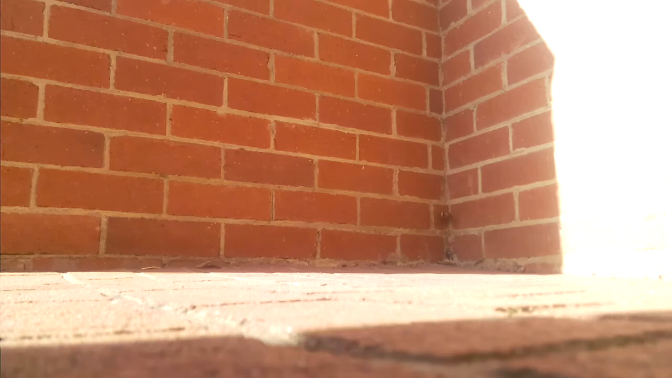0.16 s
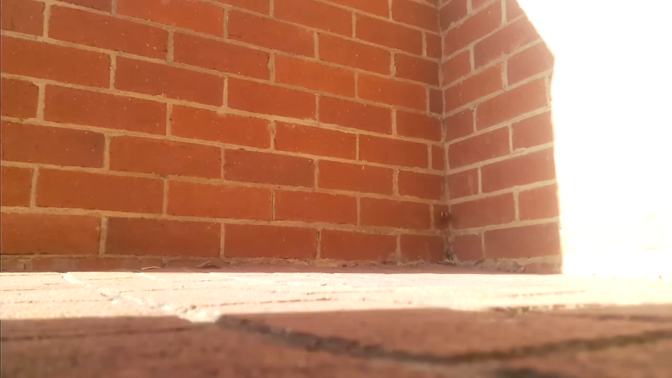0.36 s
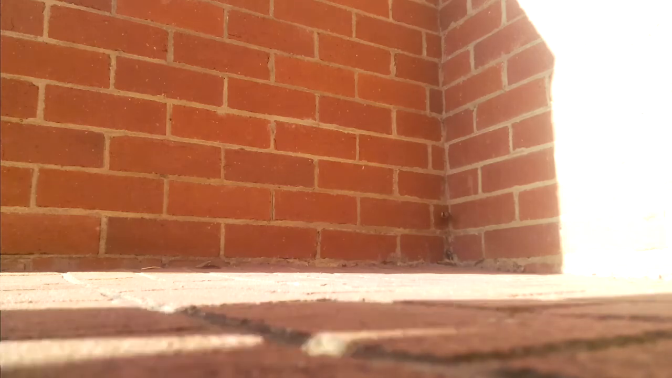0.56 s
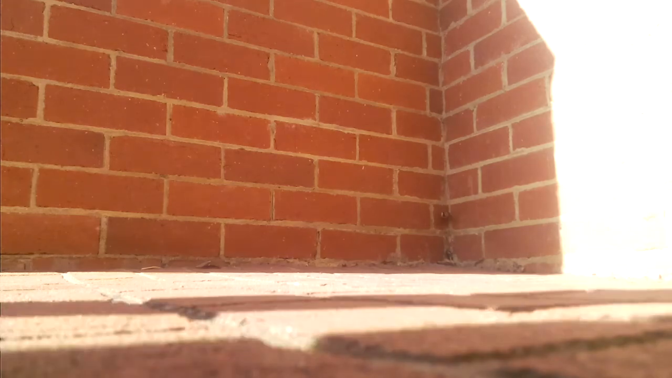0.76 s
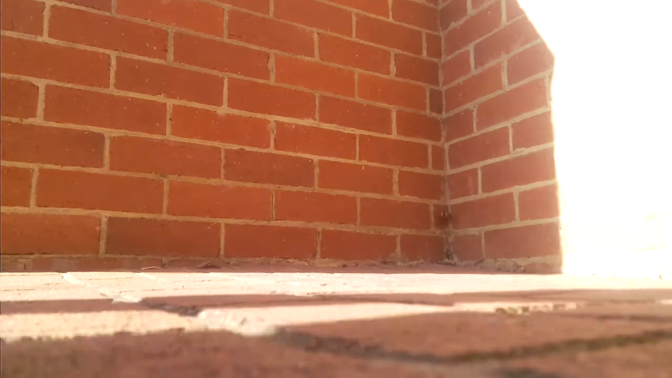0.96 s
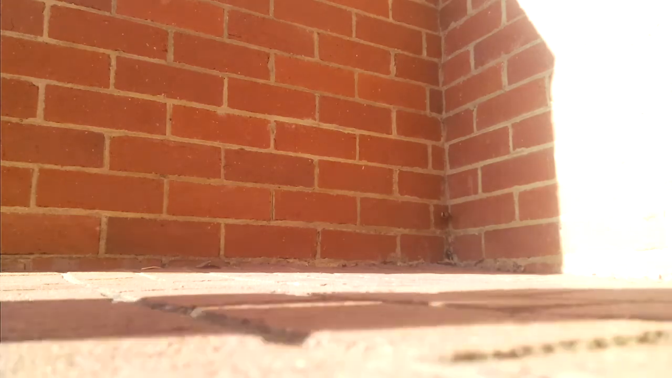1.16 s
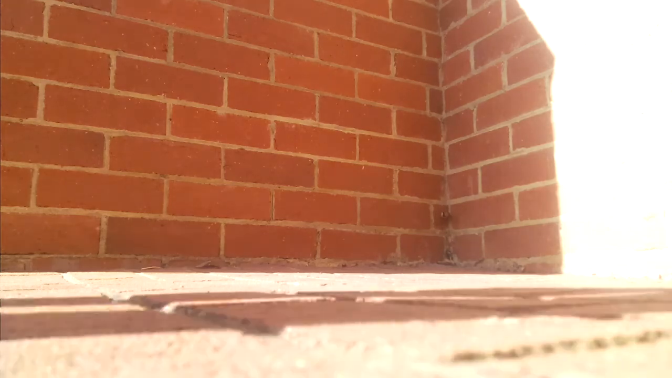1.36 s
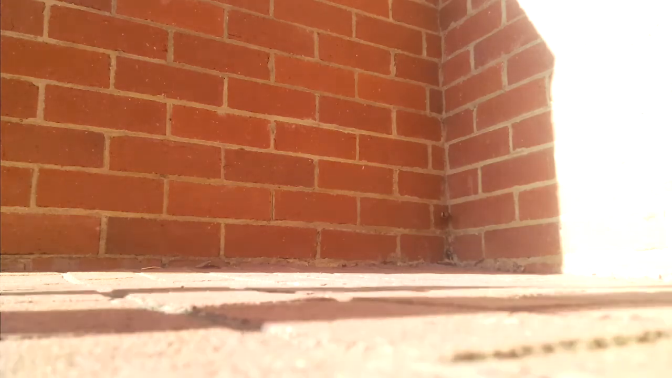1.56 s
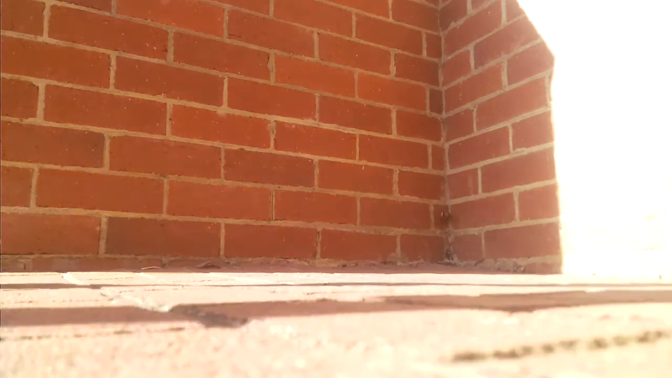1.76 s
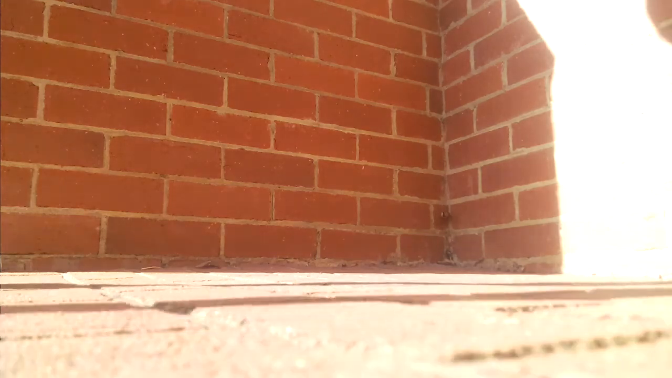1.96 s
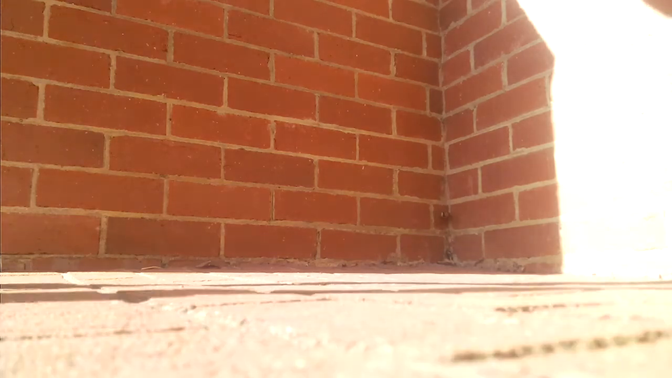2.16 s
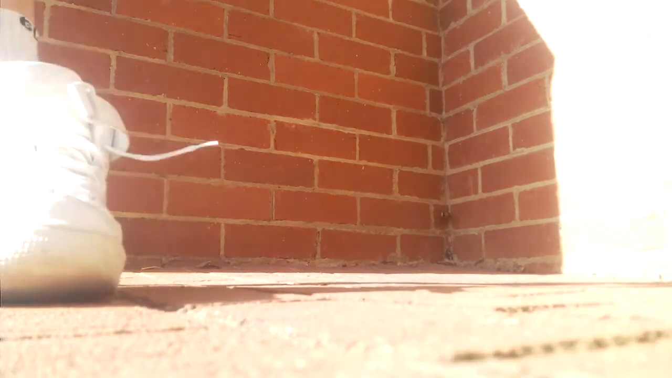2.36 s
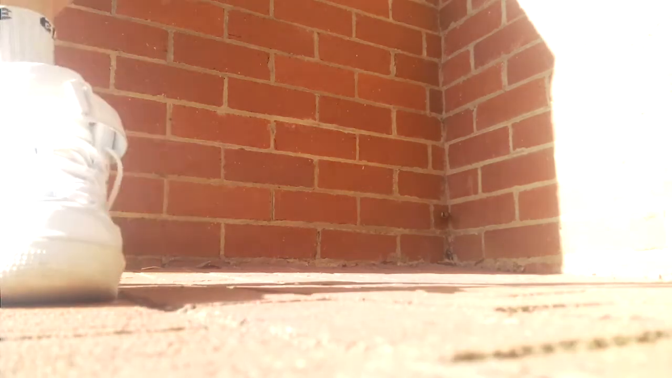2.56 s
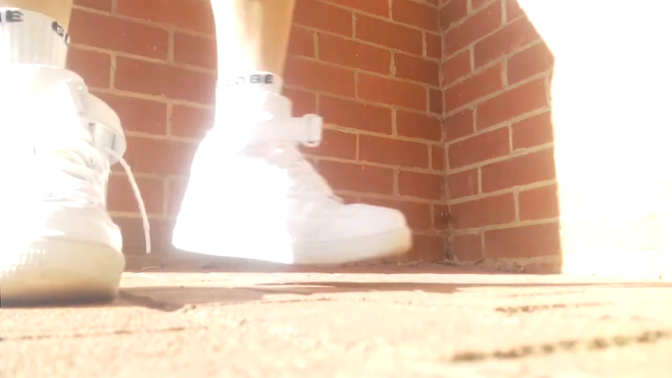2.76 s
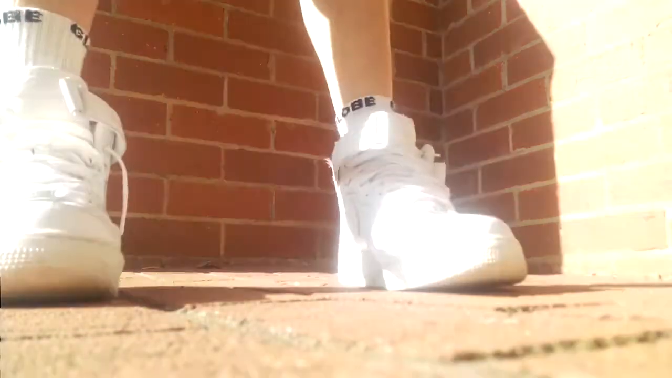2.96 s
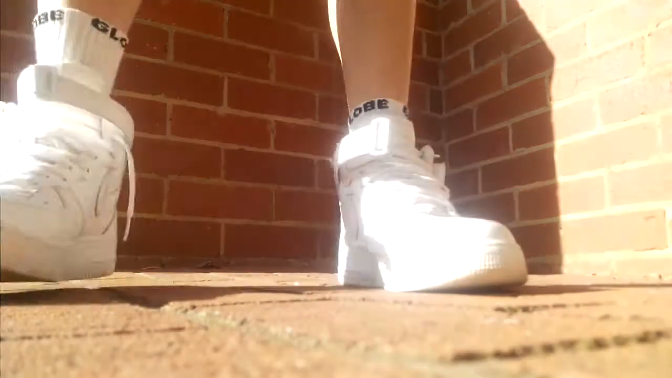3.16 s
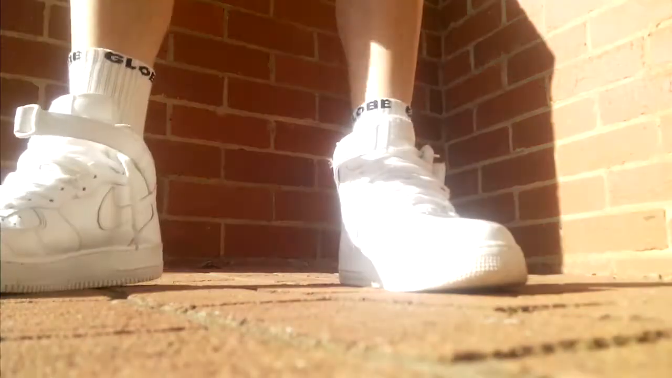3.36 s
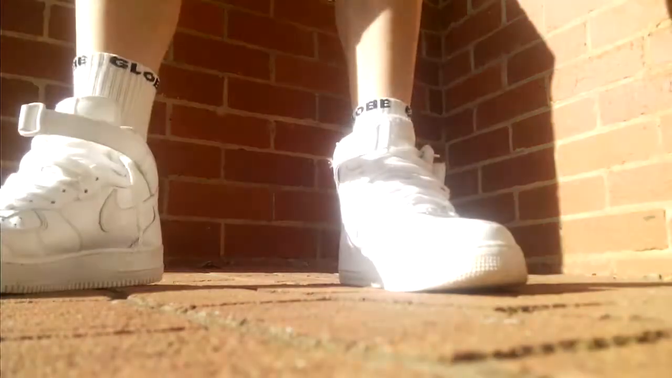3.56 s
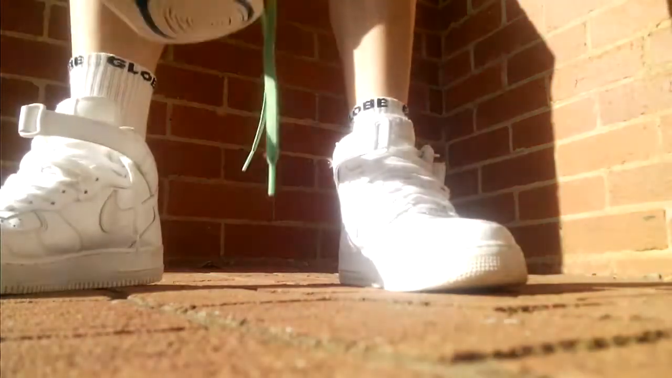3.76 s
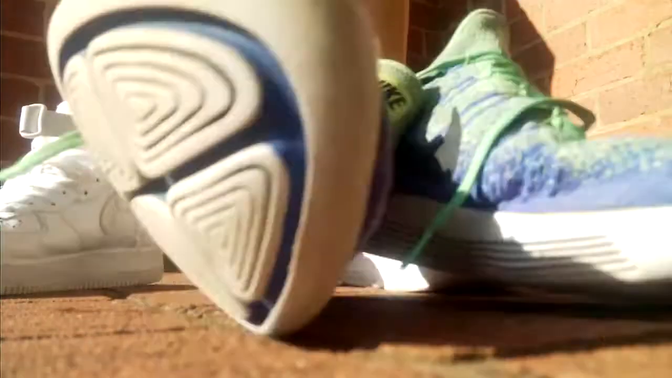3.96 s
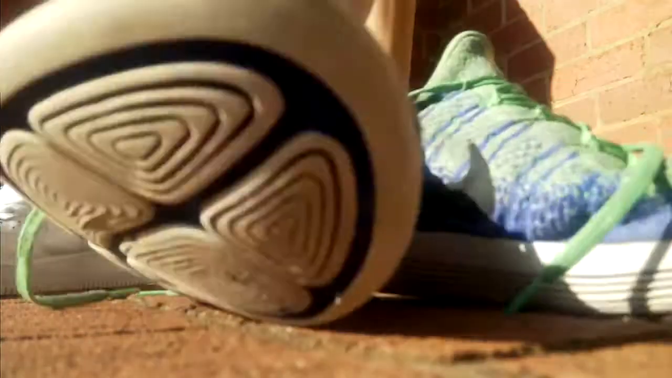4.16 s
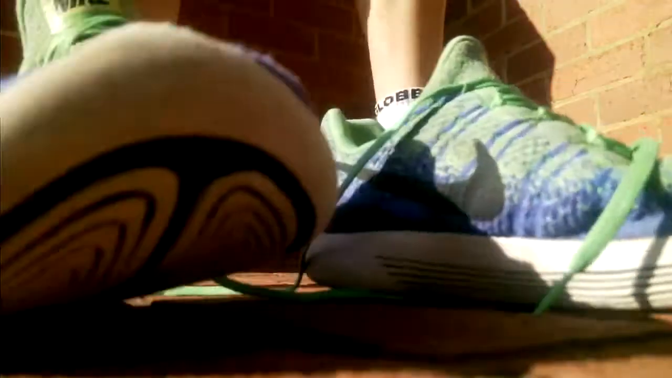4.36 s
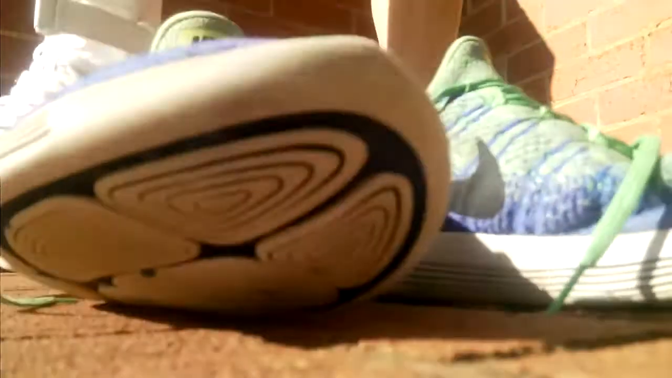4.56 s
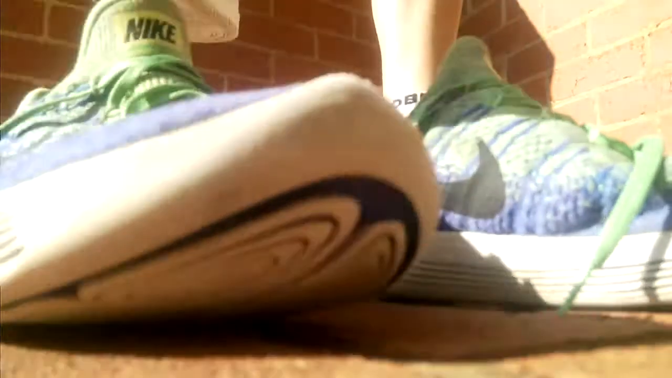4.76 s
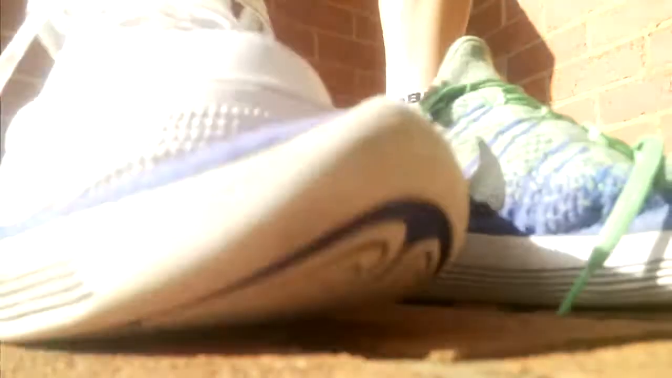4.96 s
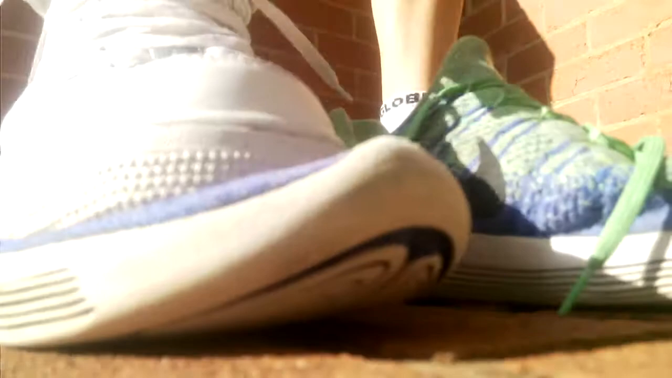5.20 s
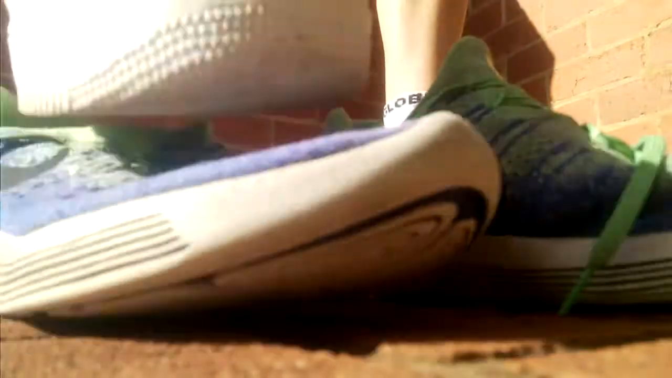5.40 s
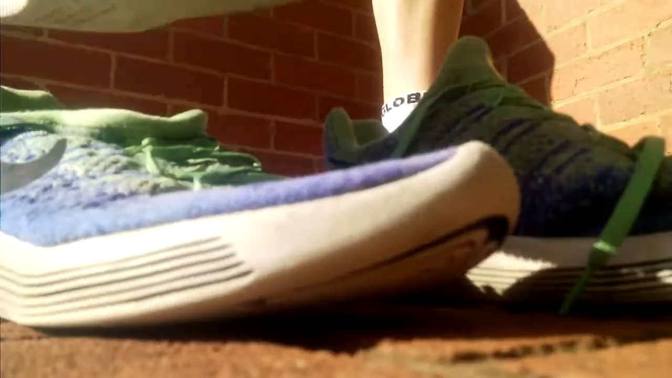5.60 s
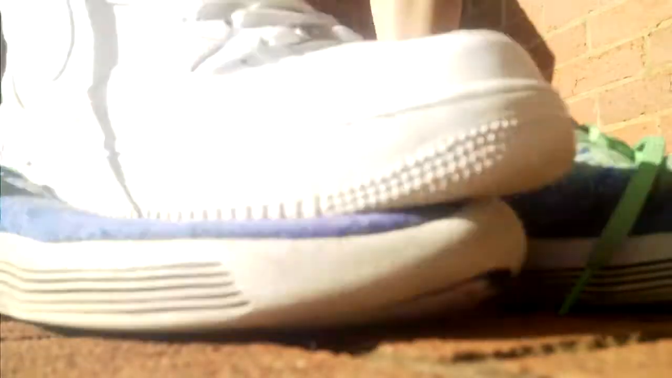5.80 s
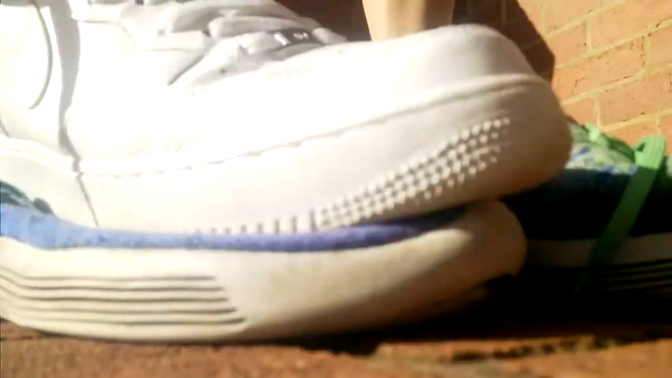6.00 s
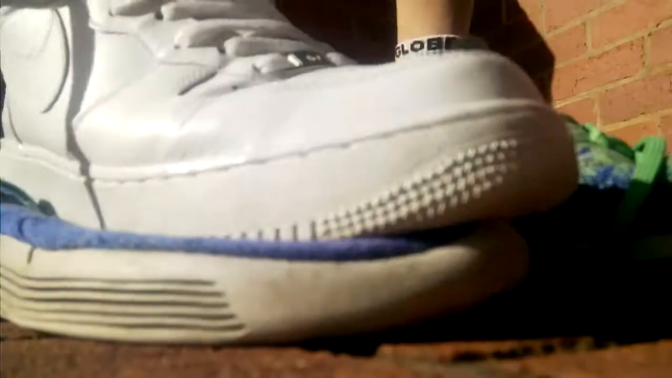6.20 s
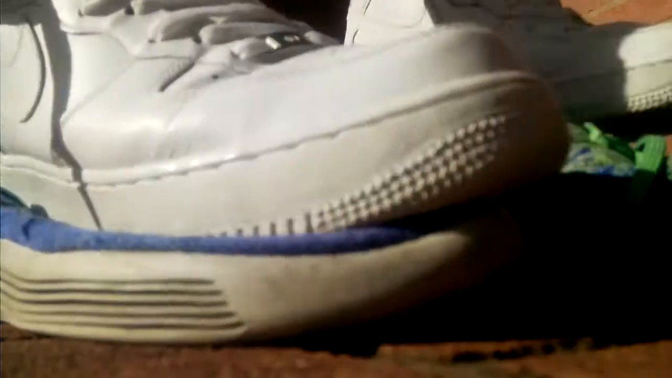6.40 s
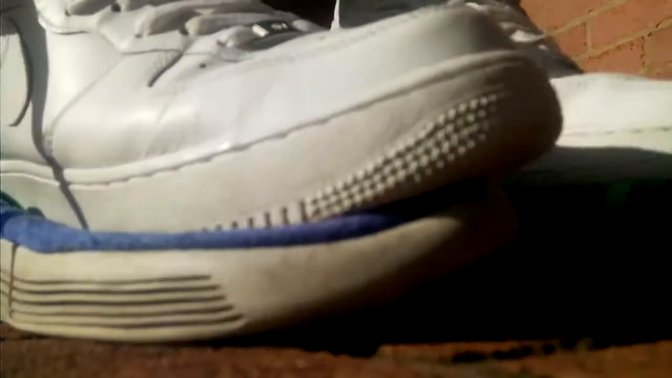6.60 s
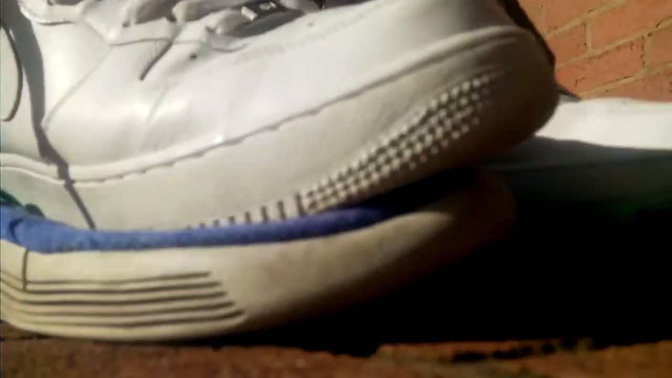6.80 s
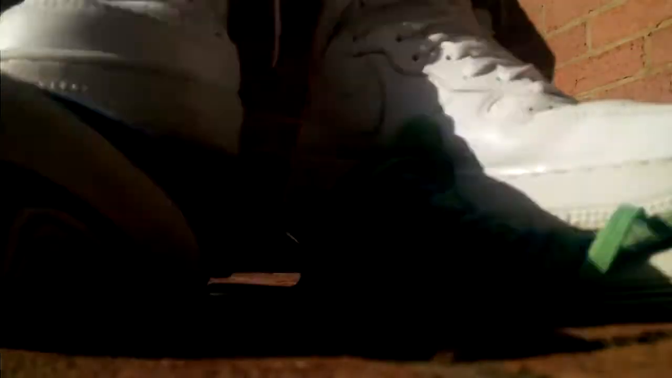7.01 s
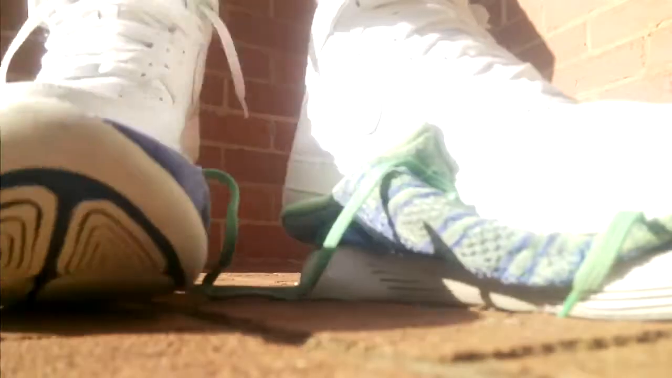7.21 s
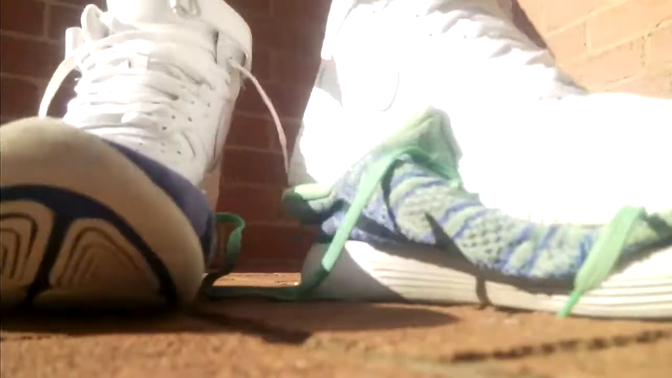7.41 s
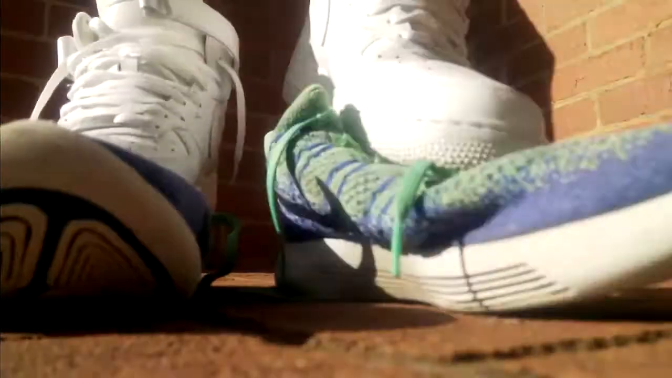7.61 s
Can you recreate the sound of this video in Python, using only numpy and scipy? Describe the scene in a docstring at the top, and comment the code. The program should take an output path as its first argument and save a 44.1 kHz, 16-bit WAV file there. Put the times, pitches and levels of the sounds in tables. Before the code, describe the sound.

A low distant town rumble and soft outdoor hiss run throughout, with two very faint bird whistles at about 0.2 and 1.1 seconds. From 0.7 seconds, soft sneaker steps on brick paving come roughly every 0.6 seconds, growing louder until about 3.2, each a dull thud with small clicks of grit and lace tips and a light scuff. At 4.1 seconds a pair of trainers lands right beside the microphone on the ground: a loud, sharp knock and thump, tumbling through smaller bumps until about 4.6. At 5.2 comes the heaviest thud as a shoe is trodden on, briefly overloading, followed by rubbing. Another firm thud falls at 6 seconds and a softer one at 6.8. From 7.1 to 7.6 seconds rubber soles drag in quick raspy scuffs with gritty clicks. Nearby walls add a slight, tight reflection to the clicks and scuffs.

```python
"""Soft sneaker steps on brick paving in a wall corner, over low town rumble. Then a pair of trainers
is dropped and trodden on, right beside the microphone: a phone lying on the ground.
Soles thud through the paving, grit and lace tips click, dragged rubber scuffs; the near walls return
the clicks and scuffs. The hardest blows overload the phone. Far off are a soft hiss and a faint bird."""
import sys
import numpy as np
from scipy import signal
from scipy.fft import rfft, irfft, next_fast_len
from scipy.io import wavfile
from scipy.ndimage import uniform_filter1d

SR = 44100
rng = np.random.default_rng(int(sys.argv[2]) if len(sys.argv) > 2 else 0)


def generate_wav(sig):
    """Save sig (samples, or channels by samples) to the path in sys.argv[1] as 16-bit PCM at SR."""
    pcm = np.round(np.clip(np.atleast_2d(sig).T, -1, 1) * 32767).astype(np.int16)
    wavfile.write(sys.argv[1], SR, pcm)


N = 337365


# Soles landing near the phone: t/s, peak level/dB, ground ring f/Hz, contact time/ms,
# first swing (1 up, -1 down), shoe hollow re ground ring/dB
SOLE_BLOWS = [(0.675, -25, 206.6, 1.543, 1, -5), (1.371, -21.5, 154, 1.8, 1, -0.5),
              (1.998, -18, 156, 2.5, -1, -10), (2.538, -19, 150.2, 3, 1, -7),
              (2.582, -17.5, 215.3, 2.34, 1, -17), (3.149, -14.5, 137.6, 2.98, -1, 4.5),
              (3.329, -32, 168, 2.4, 1, -2.5), (3.516, -29.5, 198.5, 2.9, -1, -3),
              (4.091, -10, 132, 2.8, 1, 0), (4.105, -19.5, 126, 4, -1, -5.5),
              (4.1209, 0, 115.4, 2, -1, -8.5), (4.184, -13, 113.5, 3.6, -1, 5.5),
              (4.199, -14, 92.6, 4, -1, -5), (4.261, -19.5, 100.6, 5.3, -1, -10),
              (4.29, -19.5, 121.2, 3.6, 1, -18.5), (4.345, -31, 96.02, 4.3, 1, -15.5),
              (4.399, -27.5, 89.6, 3.9, -1, -13.5), (4.461, -26, 91.1, 3.3, 1, 1),
              (4.568, -19.5, 191, 1.02, -1, 1), (4.874, -28.5, 144, 3.5, 1, -19),
              (5.14, -18, 119.4, 5.4, 1, -5), (5.1555, 5.5, 140, 2.0, -1, -16),
              (5.173, -11, 240.5, 1.4, -1, 2.5), (5.187, -15, 94.8, 4.1, -1, -7),
              (5.952, -25, 105, 4.1, -1, -15.5), (5.988, -8, 149.7, 1.31, 1, -19.5),
              (6.005, -14, 102, 5.5, 1, -13.5), (6.792, -17, 115.5, 4.9, -1, -2.5),
              (6.86, -27, 125.2, 4.8, -1, -10.5), (7.457, -25, 108, 2.6, 1, -14.5)]
# Air ringing inside a shoe: f/Hz, t60/s
SHOE_HOLLOW = [(300, 0.0334), (500, 0.022), (800, 0.034)]
def thuds():
    """A half-sine push rings the paving under the phone (main mode, deep sway) and the shoe's hollow."""
    mid, side, t = np.zeros(N), np.zeros(N), np.arange(8192) / SR
    for start, db, hz, contact_ms, swing, hollow_db in SOLE_BLOWS:
        push = np.sin(np.pi * np.clip(1000 * t / contact_ms, 0, 1))
        t60 = 6.18 / hz  # the ground ring dies in about six cycles
        modes = [(hz, t60, 0), (0.65 * hz, 1.9 * t60, -10)]
        modes += [(f, fade, hollow_db) for f, fade in SHOE_HOLLOW]
        ringing = sum(undb(level) * np.cos(2 * np.pi * f * t) * np.exp(-np.log(1000) * t / fade)
                      for f, fade, level in modes)
        blow = signal.fftconvolve(push, ringing)[:len(t)]
        blow *= swing * undb(db) / np.max(np.abs(blow))
        add(mid, blow, start)
        add(side, np.gradient(blow) * SR / (2 * np.pi * hz), start)  # reaches one port a moment sooner
    return ports(mid, side, SHOE_SIDE)


# Grit and lace tips on brick, close up: t/s, relative level/dB, knock and tick re click/dB, click t60/s
GRIT_HITS = [(0.6724, -36, -20, 3.5, 0.0685), (0.844, -43, -9, 0.5, 0.03), (.865, -48.5, -15, 9.5, 0.0126),
             (0.9135, -45, -22.5, 13, 0.043), (.958, -42.5, -23, 8, 0.018),
             (1.3745, -31.5, -10.5, 4, 0.029), (1.3794, -35.5, -6, 4.5, 0.045), (1.3906, -38.5, 2, 5, 0.06),
             (1.9987, -35, 6, -23.5, 0.0334), (2.135, -43.5, -13.5, 8, 0.016),
             (2.2044, -33.5, -12, 0, .031), (2.5078, -23.5, -4.5, 3.5, 0.0054),
             (2.5384, -35.5, -10, -3, 0.033), (2.5811, -40, -15, -1, 0.027), (2.606, -38.5, -8, 4, 0.0156),
             (2.7764, -40.5, -8.5, -18, 0.0176), (3.1483, -24.5, -3, -4.5, 0.0218),
             (3.3293, -32.5, 1.5, 4, 0.0143), (3.538, -40, -15.5, 3, .012), (3.563, -29, -12, 10, 0.0128),
             (3.682, -24, -14.5, 6, 0.0083), (4.04, -44, -10.5, 11.5, 0.013),
             (4.0473, -49, -14.5, 14, 0.0094), (4.059, -49, -4.5, 16.5, 0.044),
             (4.0896, 1, -13, -8, 0.0218), (4.1213, -12, 8, -1.5, 0.0099),
             (4.1272, -11.5, -19.5, 3.5, 0.0173), (4.159, -24.5, 1.5, -13.5, 0.015),
             (4.1701, -43, -2.5, 0, .014), (4.1837, -17.5, 3, -.5, 0.0252), (4.2225, -18, -20, 1.5, 0.013),
             (4.2918, -22.5, -10.5, -18, 0.0077), (4.389, -40.5, -19, 7, 0.013),
             (4.4717, -34, -12, -9, 0.033), (4.5934, -37.5, 1.5, -19.5, 0.025),
             (4.6341, -40.5, -3.5, -10.5, .044), (4.872, -41.5, 3, -5, .023),
             (5.1003, -41.5, 1.5, .5, 0.0236), (5.1376, -29.5, -14.5, -3, 0.034),
             (5.1564, -17.5, 8.5, -5, 0.0109), (5.1741, -22.5, -1.5, 1.5, 0.0069),
             (5.224, -36.5, -3.5, -3.5, 0.054), (5.3632, -24.5, -19.5, -18.5, 0.0079),
             (5.9863, -21.5, 1, -12, 0.0066), (5.997, -29.5, -18, -8, 0.0227),
             (6.5211, -26, -6.5, -7, 0.0049), (6.6855, -23, -8.5, -8, 0.0045),
             (6.791, -36, 9, -21.5, 0.0205), (7.0849, -36.5, -4, 12.5, 0.0099),
             (7.1257, -18, -31, -24.5, 0.029), (7.256, -27, -6, -1, 0.0278),
             (7.285, -23.5, -17.5, -8, 0.037), (7.3135, -28.5, -17.5, -15, .016),
             (7.3318, -29.5, -19.5, -5, 0.0137), (7.3875, -27.5, 2, -13, 0.0082),
             (7.5902, -37.5, -15, -8, .01), (7.642, -37, -8.5, -3, 0.016)]
# Where the shoes are, seen from the phone: t/s, left minus right/dB
SHOE_PAN = [(0, 12.5), (1.4, -0.5), (2.5, 0.5), (3.6, -1.5), (4.2, -0.5), (5.2, 3.5), (6.5, -1.5), (7.3, 4)]
# Low, middle and high modes of sole and phone shell: f/Hz, width/Hz, level/dB
KNOCK = [(522, 130, -2), (974.5, 294, 2), (1683.4, 340, 1)]
CLICK = [(2159, 770, -0.36), (3347, 633, 0.986)]
TICK = [(3980, 725, -1), (5205, 687, -0.5), (6330, 832, -7.5)]
def clicks():
    """A short crackle strikes three groups of modes; the lower the group, the slower it fades."""
    out, t = np.zeros((2, 2, N)), np.arange(2560) / SR  # left and right, each with mid and side
    rise = 1 - np.exp(-t / 0.00096)
    for start, db, knock_db, tick_db, t60 in GRIT_HITS:
        decay = np.log(1000) * t / t60
        crackle = rng.standard_normal((3, 2, len(t))) * rise
        knock = ring(band(crackle[0] * np.exp(-.8 * decay), 350, 1300), KNOCK)
        click = ring(crackle[1] * np.exp(-decay), CLICK)
        tick = ring(crackle[2] * np.exp(-1.2 * decay), TICK)
        burst = sum(undb(level) * part / np.max(np.abs(part), axis=1, keepdims=True)
                    for part, level in [(knock, knock_db), (click, 0), (tick, tick_db)])
        pan_db = np.interp(start, *np.transpose(SHOE_PAN))
        gains = undb(db + np.array([pan_db, -pan_db]) / 2)
        add(out, gains[:, None, None] * burst, start)
    left, right = (ports(mid, side, SHOE_SIDE) for mid, side in out)
    return np.array([left[0], right[1]])


# Rubber dragged past the phone: hardest drag t/s, length/s, relative hiss level/dB, body re hiss/dB
DRAG_STROKES = [(0.919, 0.152, -51.5, -5.5), (1.479, 0.53, -56.5, -2.5), (2.027, 0.26, -52.5, 5),
                (2.54, 0.274, -53.5, -1), (2.734, 0.203, -57, -6), (3.313, 0.065, -49.5, -2.5),
                (3.567, 0.097, -52, -18), (3.705, 0.082, -56, -8.5), (4.109, 0.0445, -34, 3),
                (4.203, 0.238, -42, -3.5), (4.703, .35, -55, -5), (5.193, 0.326, -45.5, -14.5),
                (5.426, 0.14, -53.5, -7), (5.562, 0.238, -48, -8), (6.051, 0.164, -49, -9.5),
                (6.853, 0.164, -51, 0.5), (7.135, 0.14, -33.5, -12), (7.176, 0.057, -41.5, -7),
                (7.277, 0.19, -40, -2), (7.324, 0.044, -24.5, -17), (7.371, 0.086, -38.5, -7.5),
                (7.467, 0.128, -47, -4), (7.57, 0.224, -54, -7.5)]
# A sole settling, rows for hiss, body and rumble: level after a 0 dB blow/dB, dB per dB of blow,
# time to fall 20 dB/s
SOLE_SETTLING = [(-40.5, 1.69, 0.0012), (-45.5, .5, 0.0887), (-20, 0.83, 0.0557)]
def drag():
    """Gains of hiss, hollow body and rumble: strokes swell and fade, blows leave a short settling."""
    gains, t = np.zeros((3, N)), np.arange(SR // 2) / SR
    for peak_s, length, db, body_db in DRAG_STROKES:
        rise = 0.506 * length
        from_peak = np.where(t < rise, 1 - t / rise, (t - rise) / (length - rise))  # 1 = 20 dB down
        peak_db = db + np.array([[0], [body_db], [body_db + 6.5]])
        add(gains, undb(peak_db - 20 * from_peak ** 1.478), peak_s - rise)
    for start, db, *_ in SOLE_BLOWS:
        settling_db = [top_db + slope * db - 20 * t / fall for top_db, slope, fall in SOLE_SETTLING]
        add(gains, undb(settling_db), start)
    return gains


# Phone-shell resonances that colour the rasp of rubber on brick: f/Hz, width/Hz, level/dB
RASP_RESONANCES = [(2250, 600, -1), (2850, 500, -2), (3600, 500, 1), (4900, 900, -2), (6000, 700, -7)]
def scuffs(grains_per_s=4000, spread_db=3.0):
    """Rubber lightly catches and slips in dense, uneven grains; the drag also shakes the ground."""
    hiss_gain, body_gain, rumble_gain = drag()
    catches = (rng.random(N) < grains_per_s / SR) * undb(spread_db * rng.exponential(size=N))
    friction = np.convolve(catches, np.exp(-np.arange(64) / 10), "same") * undb(1.52 * walk(90))
    noise = rng.standard_normal((2, N))
    grains = band(noise * friction, 2000, 7800)
    # the contact patch keeps changing, so each resonance wavers on its own
    rasp = sum((-1) ** k * undb(1.5 * walk(25)) * ring(grains, [mode])
               for k, mode in enumerate(RASP_RESONANCES))
    body = ring(band(noise * friction, 150, 1400), KNOCK)
    rumble = band(noise, 25, 202)
    mid, side = hiss_gain * unit(rasp) + body_gain * unit(body) + rumble_gain * unit(rumble)
    return ports(mid, side, SHOE_SIDE)


# Reflections in the corner, a few metres at most from the phone: delay t/s, level/dB
CORNER_ECHOES = [(.0045, -25.5), (.0075, -22.5), (0.015, -18.5)]
def walls(near):
    """The walls return the close sounds with left and right swapped."""
    out = np.zeros_like(near)
    for delay, db in CORNER_ECHOES:
        add(out, undb(db) * near[::-1], delay)
    return out


# The distant town and open air, heard at ground level: f/Hz, relative level/dB
TOWN_SPECTRUM = [(12, -51.5), (20, -7), (59, -5.5), (155, -1), (199, -8), (263, -12.5), (339, -19),
                 (385, -20), (471, -26.5), (688, -26), (821, -29.5), (1800, -36), (4460, -35.5),
                 (6200, -39), (8390, -49.5), (10900, -96), (18500, -120)]
# That air across the two microphone ports: f/Hz, side re mid/dB
TOWN_SIDE = [(60, -20), (250, -15.5), (500, -2.5), (1000, -4.5), (2500, -5), (4000, 0.5), (7000, 6.5)]
def town_air(level_db=-41):
    """Distant rumble and outdoor hiss, each wavering on its own."""
    mid, side = colour(rng.standard_normal((2, N)), TOWN_SPECTRUM)
    air = undb(level_db) / np.sqrt(np.mean(mid ** 2)) * ports(mid, side, TOWN_SIDE)
    rumble = signal.sosfiltfilt(signal.butter(2, 350, fs=SR, output="sos"), air)
    rumble_gain = undb(0.22 * walk(5.5) + 0.21 * walk(9))
    hiss_gain = undb(0.098 * walk(0.84) + 0.33 * walk(4.7))
    return rumble * rumble_gain + (air - rumble) * hiss_gain


# One bird, far from the microphone: t/s, length/s, f/Hz, level/dB
BIRD_CALLS = [(0.205, 0.193, 4420, -63.5), (1.08, 0.17, 4470, -65)]
def bird():
    """Thin breathy whistles, blurred by distance."""
    out = np.zeros(N)
    for start, length, hz, db in BIRD_CALLS:
        t = np.arange(int(length * SR)) / SR
        whistle = band(rng.standard_normal(len(t)), .96 * hz, 1.04 * hz)
        add(out, undb(db) * unit(whistle) * np.sin(np.pi * t / length), start)
    return out


# The close shoes across the two microphone ports: f/Hz, side re mid/dB
SHOE_SIDE = [(60, -16.5), (250, -19.5), (500, -5), (1000, -11.5), (2500, -7.5), (4500, -1), (7000, 7.5)]
def ports(mid, side, side_spectrum):
    """The phone's left and right ports, from what they share (mid) and what differs (side)."""
    side = colour(side, side_spectrum)
    return np.array([mid + side, mid - side])


def ring(x, modes):
    """Sum of resonances, neighbours in opposite phase."""
    return sum((-1) ** k * undb(db) * signal.lfilter(*signal.iirpeak(hz, hz / width, fs=SR), x)
               for k, (hz, width, db) in enumerate(modes))


def colour(x, spectrum):
    """Weight a sound by (f/Hz, level/dB) points."""
    hz, db = np.transpose(spectrum)
    size = next_fast_len(N + 4096)
    log_f = np.log(np.arange(size // 2 + 1) * SR / size + 1)
    return irfft(rfft(x, size) * undb(np.interp(log_f, np.log(hz), db)), size)[..., :N]


def walk(rate):
    """Random levels held 1 / rate s and smoothed twice; spread near 1."""
    hold = int(SR / rate)
    steps = np.repeat(rng.standard_normal(N // hold + 1), hold)
    return 1.665 * uniform_filter1d(uniform_filter1d(steps, hold), hold)[:N]


def band(x, lo_hz, hi_hz):
    return signal.sosfilt(signal.butter(2, [lo_hz, hi_hz], "bandpass", fs=SR, output="sos"), x)


def undb(db):
    return 10 ** (np.asarray(db) / 20)


def unit(x):
    return x / np.sqrt(np.mean(x ** 2))


def add(out, x, start_s):
    i = int(start_s * SR)
    out[..., i:i + x.shape[-1]] += x[..., :N - i]


def scene():
    """Shoes at the microphone, walls close by, town and bird far off."""
    near = undb(-3.5) * clicks() + undb(-1.7342) * scuffs()
    return near + walls(near) + thuds() + town_air() + bird()


def record(dry):
    """The phone drops the deepest bass, overloads on the hardest blows and cuts the top."""
    x = signal.sosfilt(signal.butter(1, 35, "highpass", fs=SR, output="sos"), dry)
    x = signal.sosfilt(signal.butter(6, 6900, fs=SR, output="sos"), x)
    x = np.clip(x, -.98, .98)
    return signal.sosfilt(signal.ellip(8, .2, 60, 8350, fs=SR, output="sos"), x)


dry = scene()
out = record(dry)
generate_wav(out)
```